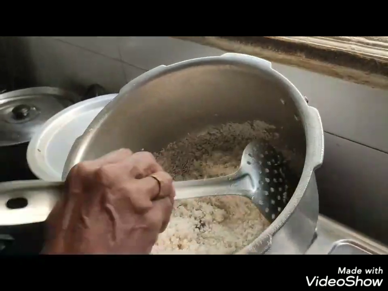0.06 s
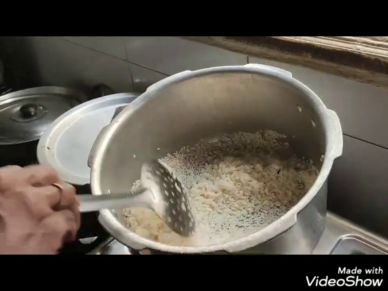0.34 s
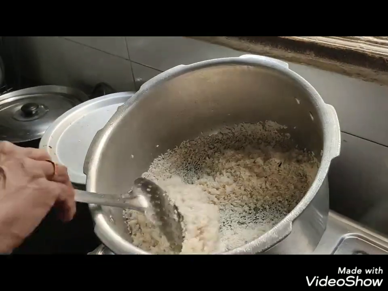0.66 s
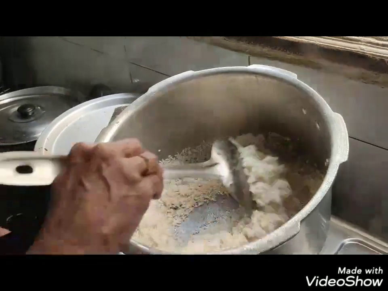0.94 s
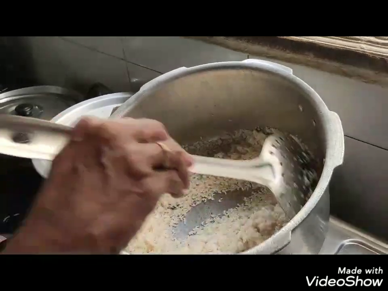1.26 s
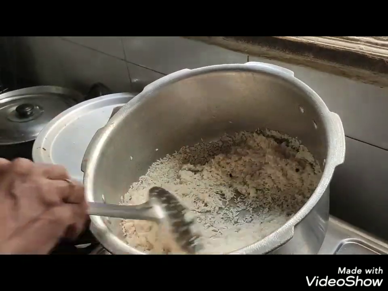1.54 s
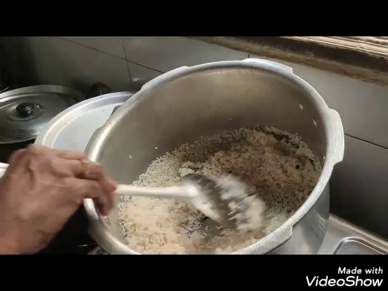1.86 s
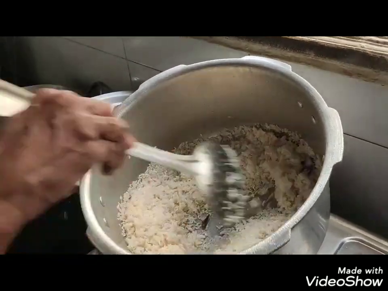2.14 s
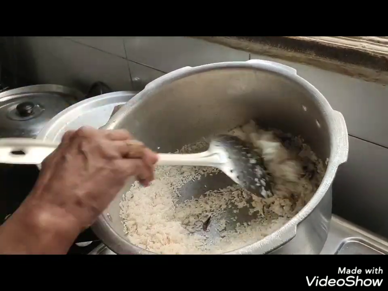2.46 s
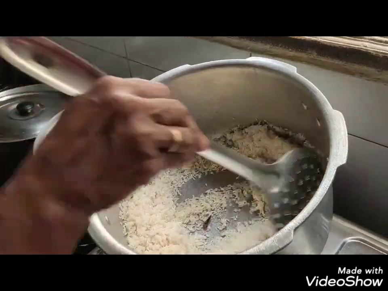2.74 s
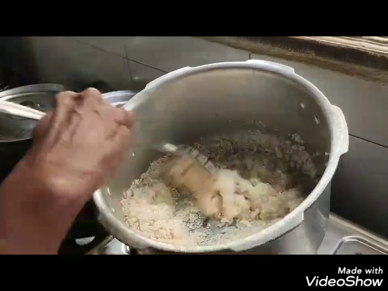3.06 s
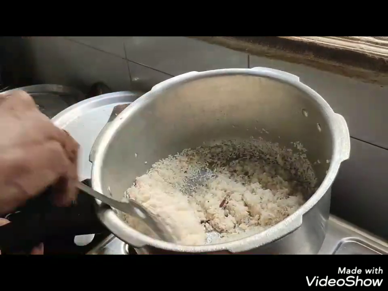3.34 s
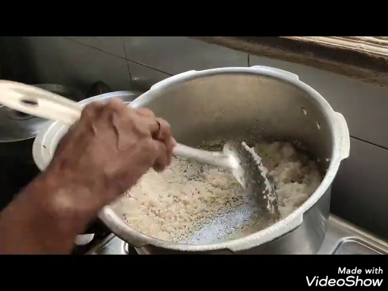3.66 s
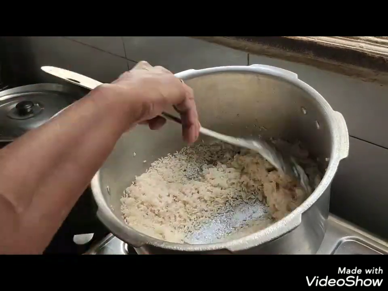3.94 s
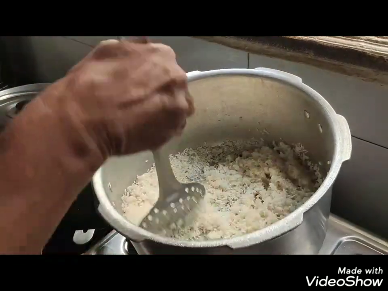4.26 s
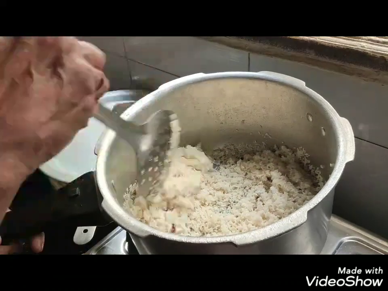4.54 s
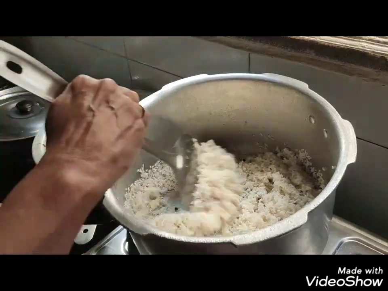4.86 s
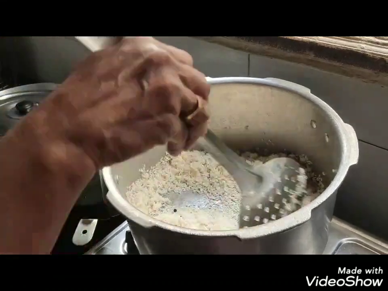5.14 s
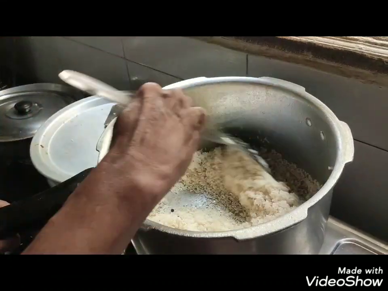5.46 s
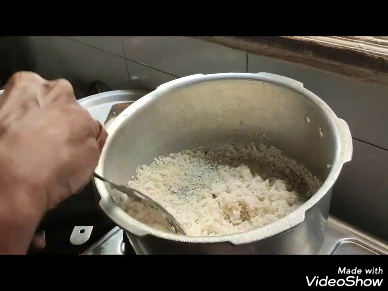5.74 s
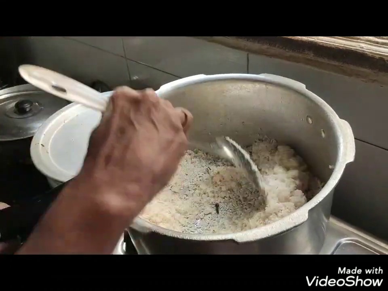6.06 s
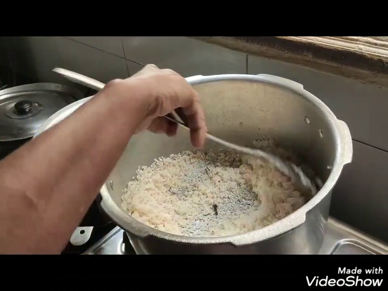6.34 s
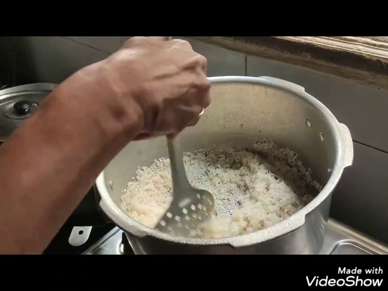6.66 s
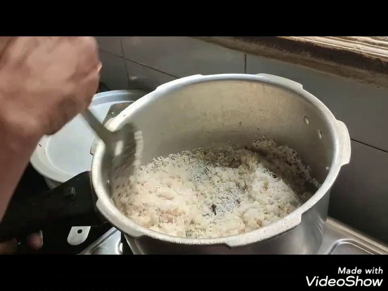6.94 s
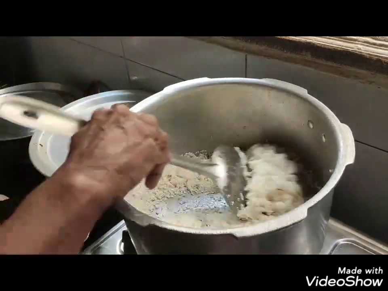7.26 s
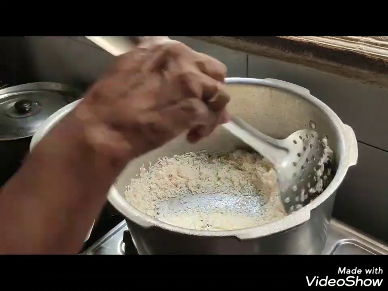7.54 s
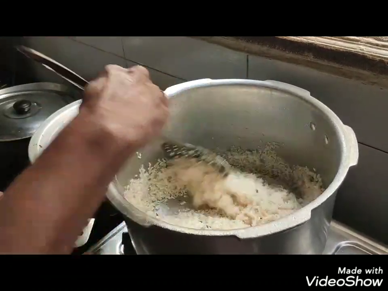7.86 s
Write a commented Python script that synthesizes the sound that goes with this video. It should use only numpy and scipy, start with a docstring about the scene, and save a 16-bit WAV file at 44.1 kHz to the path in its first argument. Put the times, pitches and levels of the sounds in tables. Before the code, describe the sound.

A perforated steel spoon knocks and scrapes around a metal pot, turning damp rice over a light sizzle.

```python
"""A sharp clack, close up: a perforated steel spoon hits an aluminium cooker and starts turning rice.
Its edge sticks and slips over the crusted bottom, snaps free, sings up the wall and knocks again,
ringing spoon and pot. Damp rice thuds and groans as it is pushed ahead. Steam bubbles sizzle lightly
in the hollow of the pot; behind it are a low kitchen rumble, a brief hum and a faint cricket-like chirp."""
import sys
import numpy as np
from scipy import signal
from scipy.fft import rfft, irfft
from scipy.io import wavfile

SR = 44100
rng = np.random.default_rng(int(sys.argv[2]) if len(sys.argv) > 2 else 0)


def unload_audio(sound):
    """Save the sound as a 16-bit wav file, at the path given as the first command line argument."""
    columns = np.transpose(np.atleast_2d(sound))
    # keep every value between -1 and 1, then stretch to whole-number steps
    steps = np.round(np.clip(columns, -1, 1) * 32767)
    wavfile.write(sys.argv[1], SR, steps.astype(np.int16))


N = 357210
T = np.arange(N) / SR
HIT = SR // 3  # samples in a one-shot


def undb(db):
    """Decibels to gain."""
    return 10 ** (np.asarray(db) / 20)


def unit(x):
    """Scale to rms 1."""
    return x / np.sqrt(np.mean(x ** 2))


def convolve(x, response):
    """Pass a sound through an impulse response, per channel."""
    return signal.oaconvolve(np.atleast_2d(x), response, axes=1)[:, :N]


def colour(x, points, size=2048):
    """Minimum-phase EQ through (frequency [Hz], gain [dB]) points."""
    hz, db = np.transpose(points)
    outline = np.interp(np.log(np.fft.rfftfreq(size, 1 / SR) + 1), np.log(hz), db)
    cepstrum = irfft(np.log(undb(outline)))
    cepstrum[1:size // 2] *= 2
    cepstrum[size // 2 + 1:] = 0
    return convolve(x, irfft(np.exp(rfft(cepstrum)))[None])


def noise(size=N, likeness=0.054):
    """Stereo white noise; likeness is the share of power common to both channels."""
    centre = rng.standard_normal(size)
    return np.sqrt(likeness) * centre + np.sqrt(1 - likeness) * rng.standard_normal((2, size))


def fall(t60, size=HIT):
    """Exponential decay, 60 dB down after t60 seconds."""
    return np.exp(-np.log(1000) * T[:size] / t60)


def gesture(start, hold, attack, release):
    """Envelope at full level from start for hold seconds; attack and release are seconds per 20 dB."""
    below = np.maximum(start - T, 0) / attack + np.maximum(T - start - hold, 0) / release
    return 10 ** -np.minimum(below, 10)


def cue(start):
    """The samples covered by a one-shot fired at start seconds."""
    return slice(int(start * SR), int(start * SR) + HIT)


def walk(rate):
    """Random drift with rate turning points a second, spread near 1."""
    return np.interp(T * rate, np.arange(N // 20), rng.standard_normal(N // 20))


def grains(rate, spread_db):
    """Tiny random impacts of uneven size, about rate a second."""
    clicks = (rng.random(N) < rate / SR) * rng.choice([-1, 1], N)
    return unit(clicks * undb(spread_db * np.clip(rng.standard_normal(N), -2, 2)))


def ring(modes):
    """Struck modes: their strengths depend on the point of contact, their phases on the channel."""
    t = T[:HIT]
    total = 0
    for hz, db, t60 in modes:
        phase = rng.uniform(0, 2 * np.pi) + .7 * rng.standard_normal((2, 1))
        strength = undb(db + rng.uniform(-4, 4))
        build = 1 - np.exp(-(t * hz / 2) ** 2)  # a mode takes a few cycles to form
        total = total + strength * build * fall(t60) * np.sin(2 * np.pi * hz * t + phase)
    return total


def resonate(x, hz, t60):
    """One resonance whose centre may glide; complex output."""
    turn = np.exp(2j * np.pi * np.cumsum(hz) / SR)
    return signal.lfilter([1], [1, -np.exp(-np.log(1000) / (t60 * SR))], x / turn) * turn


def reflections(t60, wet_db):
    """Impulse response of the direct sound and its dense reflections inside the pot."""
    response = noise(SR // 4) * fall(t60, SR // 4)
    response *= undb(wet_db) / np.sqrt(np.sum(response[0] ** 2))
    response[:, 0] += 1
    return response


def scatter(x, t60, wet_db):
    """Spread grains all over the pot, each with its own short tail of reflections."""
    tail = np.sqrt(abs(convolve(x ** 2, fall(t60, SR // 2)[None] ** 2))) * noise()
    return unit(x + undb(wet_db) * unit(tail))


def travel(x, response, count=5):
    """The spoon moves on: every 1/20 s it excites the next of count spots on the pot, round robin."""
    place = (T * 20).astype(int) % count
    return unit(sum(convolve(x * (place == k), response()) for k in range(count)))


# EQ of the room tone and of the rumble under it: (frequency [Hz], gain [dB])
ROOM_EQ = [(20, 8.5), (60, 8), (120, 9.5), (280, 4), (500, 0), (750, -7.5), (2000, -14)]
RUMBLE_EQ = [(26, 7.5), (45, -0.5), (200, -64)]
# fader ride on the rumble: (time [s], relative level [dB])
RUMBLE_RIDE = [(0.0, -58.5), (1.1, -60.5), (2.2, -56.5), (2.7, -60.5), (4.0, -63.5), (8.1, -73.5)]

def kitchen(room_db=-52):
    """The bed: low, wavering room tone over a deep rumble that slowly recedes."""
    room = unit(colour(noise(likeness=0.82), ROOM_EQ)) * undb(room_db + 2 * walk(5.7))
    rumble = unit(colour(noise(likeness=0.87), RUMBLE_EQ))
    ride_db = np.interp(T, *np.transpose(RUMBLE_RIDE))
    return room + rumble * undb(ride_db + 9)


# one background swell: (time [s], hold [s], pitch [Hz], level [dB])
HUM_CUE = (0.36, 0.07, 156, -50)

def hum():
    """A brief low hum swells and fades."""
    start, hold, hz, db = HUM_CUE
    return undb(db) * gesture(start, hold, attack=0.06, release=0.1) * unit(np.sin(2 * np.pi * hz * T))


def chirps(hz=2520, pulses_per_s=24.3, width_hz=140, group_s=0.22):
    """Cricket-like chirping: rough pulses of narrow-band noise, in little groups with pauses between."""
    beat = np.cumsum(pulses_per_s * (1 + 0.1292 * walk(9))) / SR
    pulses = np.sin(np.pi * beat) ** 10
    groups = np.cos(np.pi * T / group_s) ** 4 * undb(3 * walk(7))
    band = [(hz + widths * width_hz, db) for widths, db in [(-3, -45), (-.5, 0), (.5, 0), (3, -45)]]
    return unit(colour(noise(), band) * pulses * groups) * undb(-55.5)


# turned rice lands on hot metal and the sizzle flares: (time [s], level [dB])
SIZZLE_FLARES = [(1.8, -42), (3.25, -41.5), (3.848, -56), (4.5, -51), (4.95, -43), (5.76, -40.5),
                 (8.048, -37.5)]
# EQ of the bursting bubbles: (frequency [Hz], gain [dB])
SIZZLE_EQ = [(500, -6), (1000, -1.5), (1400, -6.5), (2000, 1.5), (2700, 3.5), (3600, -4.5), (4800, -4),
             (6500, 1), (9700, 4.5), (12500, 0.5), (15000, -7)]
# resonances of the air in the pot: (frequency [Hz], level [dB], t60 [s])
AIR_MODES = [(294, 0, 0.1), (440, -1, 0.07), (1008, 1, 0.09), (1153, 4, 0.04), (1560, 1, 0.05),
             (2490, 5, 0.05)]

def sizzle(simmer_db=-42):
    """Tiny steam bubbles burst, livelier after rice is turned; the air in the pot hums along."""
    flares = sum(undb(db) * gesture(s, 0, attack=0.2, release=0.97) for s, db in SIZZLE_FLARES)
    pops = grains(2500, 5) * undb(1.8 * walk(22) + 1.1 * walk(5))
    hiss = unit(colour(scatter(pops, t60=0.095, wet_db=25), SIZZLE_EQ))
    hollow = unit(convolve(grains(220, 6.6), ring(AIR_MODES)) * undb(2 * walk(8.9)))
    return hiss * np.hypot(undb(simmer_db), flares) + undb(-48.5) * hollow


# bursts of spitting: (time [s], hold [s], pre-EQ level [dB])
SPIT_CUES = [(0.385, 0.0045, -42), (1.57, 0.095, -34), (3.173, 0.48, -41), (4.876, 0.15, -36.5)]
# their thin, bright EQ: (frequency [Hz], gain [dB])
SPIT_EQ = [(1000, -38), (3000, -2.5), (8000, -0.5), (12500, -1), (15000, -16)]

def spits():
    """Wet rice sears on bare metal, and single grains crackle throughout."""
    searing = sum(undb(db) * gesture(s, hold, attack=0.038, release=0.026) for s, hold, db in SPIT_CUES)
    crackles = undb(-54) * scatter(grains(30, 6), t60=0.02, wet_db=5)
    spray = scatter(grains(900, 3), t60=0.098, wet_db=9.5)
    return colour(spray * searing + crackles, SPIT_EQ)


# the spoon shoves a heap of rice: (time [s], hold [s], relative level [dB], groan pitch [Hz])
RICE_SHOVES = [(0.795, 0.12, -41.5, 420), (1.893, 0.13, -39, 440), (2.424, 0.16, -35, 420),
               (3.058, 0.062, -41.5, 454), (3.478, 0.11, -38, 462), (3.757, 0.3, -46, 329),
               (4.17, 0.044, -33.5, 458), (4.265, 0.031, -31.5, 429), (4.925, 0.07, -40, 368),
               (5.021, 0.093, -40.5, 401), (5.24, 0.12, -44, 340), (6.501, 0.16, -35.5, 434),
               (6.674, 0.065, -32, 439), (7.162, 0.18, -38.5, 392), (7.742, 0.17, -46, 402)]
# muffled EQ of damp clumps: (frequency [Hz], gain [dB])
CLUMP_EQ = [(170, -25.5), (310, -2), (500, -0.5), (680, 0.5), (900, -4), (2000, -46), (6000, -44)]

def rice(settling_db=-56.5):
    """Damp clumps thud softly and, rubbed along under the spoon, make the bottom groan."""
    shoves = np.array([undb(db) * gesture(s, hold, attack=0.071, release=0.092)
                       for s, hold, db, _ in RICE_SHOVES])
    pitch = np.array(RICE_SHOVES)[:, 3] @ shoves / shoves.sum(axis=0)  # the strongest shove leads
    clumps = grains(380, 3)
    thuds = unit(colour(travel(clumps, lambda: reflections(0.043, 1.8), count=3), CLUMP_EQ))
    groan = resonate(clumps, pitch * (1 + 0.035 * walk(23)), t60=0.085).real
    groan = unit(colour(groan, [(150, -25), (290, 0), (600, 0), (1200, -20)]))
    level = np.hypot(shoves.max(axis=0), undb(settling_db))  # rice keeps crumbling between shoves
    return (undb(-7) * thuds + undb(-4) * groan) * level


# soft bumps: (time [s], level [dB])
LUMP_CUES = [(2.442, -17), (2.552, -14.5), (2.573, -21.5), (2.918, -17.5), (3.027, -22), (3.491, -14.5),
             (4.148, -17), (4.265, -21), (6.486, -22), (6.528, -26), (6.674, -22), (6.717, -25),
             (7.142, -21)]

def lumps(centre_hz=440, t60=0.02):
    """A lump gives way and the spoon bumps the damped bottom: a few low cycles, each bump retuned."""
    out, t = np.zeros(N + SR), T[:HIT]
    for s, db in LUMP_CUES:
        hz = centre_hz * (1 + .08 * rng.standard_normal())
        envelope = fall(t60) * (1 - np.exp(-t * hz))
        out[cue(s)] += undb(db) * np.sin(2 * np.pi * hz * t) * envelope
    return out[:N]


# low bongs: (time [s], level [dB])
BONG_CUES = [(4.17, -37.5), (4.31, -40.5), (4.736, -43), (6.73, -46.5), (7.926, -41)]
# resonances of the whole pot: (frequency [Hz], level [dB], t60 [s])
BONG_MODES = [(308, -13, 0.4), (546, 2.5, 0.84)]

def pot_body():
    """The whole pot rings on, low and hollow, when the spoon springs off it."""
    out = np.zeros((2, N + SR))
    for s, db in BONG_CUES:
        out[:, cue(s)] += undb(db) * ring(BONG_MODES) * (1 - fall(0.027))
    return out[:, :N]


# resonances of the pot's bottom: (frequency [Hz], level [dB], t60 [s])
BOTTOM_MODES = [(307.3, -8.5, 0.15), (376, -3.5, 0.087), (520, -2.5, 0.14), (1045, 1.5, 0.084),
                (1129, 1.5, 0.095), (1214, 2.5, 0.082), (1558, -2, 0.14), (1690, 18, 0.0061),
                (2157, -1.5, 0.081), (2710, 2, 0.05), (3636, -4, 0.14)]

def bottom_ring():
    """One tap on the bottom, its ring damped by rice."""
    return ring(BOTTOM_MODES)


# EQ of a contact through the crust: (frequency [Hz], gain [dB])
CRUST_EQ = [(150, -23), (450, -22), (800, -13.5), (1250, -8.5), (2400, -4), (4000, -20), (12000, -26.5)]

def crust(x):
    """The crust cushions a contact, leaving a bite in the upper mids."""
    return colour(x, CRUST_EQ)


# strokes over the bottom, with relative levels for three layers:
# (time [s], hold [s], attack [s], grind [dB], grit [dB], snags [dB])
SCRAPE_STROKES = [(0.901, 0.005, 0.088, -35, -37.5, -52), (1.983, 0.018, 0.13, -32, -39, -38),
                  (2.484, 0.029, 0.11, -31, -33.5, -28), (3.589, 0.059, 0.092, -31.5, -38.5, -34.5),
                  (4.153, 0.06, 0.0089, -41.5, -56, -64), (4.273, 0.059, 0.17, -41, -36.5, -57),
                  (6.52, 0.014, 0.15, -55, -50.5, -62), (6.699, 0.037, 0.15, -38, -44.5, -50),
                  (7.3, 0.0083, 0.1, -34.5, -36, -34.5)]
# EQ of crushed grit: (frequency [Hz], gain [dB])
GRIT_EQ = [(200, -18), (480, -4), (700, -9), (1100, 1), (2300, 4), (3400, 0), (6000, 0), (9500, -2),
           (14000, -12)]

def bottom_scrapes(stutter_per_s=37, stutter_db=1):
    """The edge sticks and slips over the bottom, ringing it, crushing grit, snagging on burnt grains."""
    pressing = crushing = snagging = 0
    for s, hold, attack, grind_db, grit_db, snag_db in SCRAPE_STROKES:
        stroke = gesture(s, hold, attack, release=0.092)
        pressing += undb(grind_db) * stroke
        crushing += undb(grit_db) * gesture(s, hold, attack, release=0.12)
        snagging += undb(snag_db) * stroke
    slips = grains(1100, 5) * undb(2.5 * walk(70))
    slips = signal.sosfilt(signal.butter(4, 260, "high", fs=SR, output="sos"), slips)
    burnt = grains(330, 3.5)
    snags = unit(crust(travel(burnt, lambda: reflections(0.018, 17), count=2))) * snagging
    grind = travel(slips, bottom_ring) * pressing
    grit = unit(colour(travel(slips, lambda: reflections(0.03, 10), count=3), GRIT_EQ)) * crushing
    jerky_hand = undb(stutter_db * walk(stutter_per_s))
    return (undb(4) * grind + undb(8) * grit + snags) * jerky_hand


# the edge catches on the crust: (time [s], pre-EQ level [dB])
CATCH_CUES = [(0.739, -15.5), (0.871, -22), (0.898, -12), (0.905, -11.5), (1.891, -8.5), (1.903, -8.5),
              (1.998, -12), (2.493, -25), (2.552, -10.5), (3.491, -6.5), (3.582, -21), (3.657, -13),
              (3.679, -10), (7.318, -9)]

def catches(snap_t60=0.016, tail_t60=0.17):
    """The edge snaps free of the crust: a sharp crack with a short tail, ringing the pot's bottom."""
    out = np.zeros((2, N + SR))
    for s, db in CATCH_CUES:
        crack = noise(HIT) * (fall(snap_t60) + undb(-4.5) * fall(tail_t60))
        out[:, cue(s)] += undb(db) * (crack + undb(-19) * bottom_ring())
    return crust(out[:, :N])


# slides along the wall: (time [s], hold [s], relative level [dB], centre of the singing [Hz])
SLIDE_CUES = [(2.889, 0.049, -34, 4100), (3.066, 0.12, -33, 7900), (3.427, 0.031, -31, 4200),
              (4.784, 0.0092, -29.5, 7300), (5.348, 0.097, -28.5, 3670), (5.58, 0.039, -34, 1950),
              (6.658, 0.094, -33, 2350), (7.138, 0.015, -28, 7000), (7.691, 0.065, -27.5, 3900),
              (7.935, 0.023, -30, 7040)]
# EQ of the rasp: (frequency [Hz], gain [dB])
RASP_EQ = [(150, -43), (520, -23), (700, -25), (900, 1), (1500, -10), (2100, 4), (3100, 5), (4100, 11),
           (6500, 5.5), (10000, 3), (14000, -6)]
# resonances of the spoon, also struck in knocks(): (frequency [Hz], level [dB], t60 [s])
STEEL_MODES = [(1880, -5.5, 0.075), (2277, -3, 0.05), (3050, -4, 0.05), (3570, 2, 0.045), (3900, 2, 0.035),
               (4140, 4.5, 0.055), (5160, 1, 0.05), (5990, 3.5, 0.04), (6590, 0, 0.045), (7600, 1.5, 0.022),
               (8550, 2, 0.025), (8960, 1, 0.025)]
# notches where the wall hardly radiates: (frequency [Hz])
WALL_NOTCHES = [3500, 5000, 8440]

def wall_slides(favour_db=2, reach_octaves=0.38, bend=0.011, flicker_db=3.5):
    """Metal on metal: fine slips rasp and make the spoon sing, its modes swelling and bending en route."""
    slips = grains(1200, 3.5) * undb(1.8 * walk(120))
    rasp = unit(colour(convolve(slips, reflections(0.045, 12)), RASP_EQ))
    contacts = np.array([undb(db) * gesture(s, hold, attack=0.025, release=0.072)
                         for s, hold, db, _ in SLIDE_CUES])
    centre_hz = np.array(SLIDE_CUES)[contacts.argmax(axis=0), 3]
    singing = 0
    for hz, db, t60 in STEEL_MODES:
        # the point of contact favours the modes near one pitch
        boost_db = favour_db * np.exp(-(np.log2(hz / centre_hz) / reach_octaves) ** 2)
        mode = resonate(slips, hz * (1 + bend * walk(20)), t60)
        mode *= undb(db + boost_db + flicker_db * walk(20))
        stereo_phase = np.exp(1j * rng.standard_normal((2, 1)))
        singing = singing + (mode * stereo_phase).real
    scrape = rasp + undb(4) * unit(singing)
    for hz in WALL_NOTCHES:
        scrape = signal.lfilter(*signal.iirnotch(hz, Q=16, fs=SR), scrape)
    return scrape * contacts.sum(axis=0)


# blows on the rim: (time [s], pitch [Hz], level [dB])
CLINK_CUES = [(0.698, 4130, -29), (2.879, 4129, -22), (4.732, 2277, -24), (7.081, 4270, -21),
              (7.661, 5640, -26)]

def clinks(t60=0.14):
    """One high mode of the spoon rings on after a blow on the rim."""
    # the clink reaches both channels together and rings clear in the middle
    align_s = np.array([[1e-4], [0]])
    out = 0
    for s, hz, db in CLINK_CUES:
        envelope = undb(db) * (T > s) * np.exp(-np.log(1000) * abs(T - s) / t60)
        out = out + envelope * np.sin(2 * np.pi * hz * (T - s + align_s))
    return out


# spoon hits the wall, levels relative: (time [s], level [dB], treble [dB], ping [dB], chatter t60 [s])
KNOCK_CUES = [(0.057,-7.5,-8.5,-27.5,0.044), (0.697,-5.5,-1,-41.5,0.036), (2.371,0.5,-10.5,-30.5,0.075),
              (2.879,-1.5,-6,-35,0.011), (3.068,-17,-5.5,-46,0.083), (3.43,-5.5,-9.5,-57,0.019),
              (3.442,-7,-4.5,-47,0.016), (3.97,-9.5,-6,-39,0.028), (4.132,-27,-1,-63,0.025),
              (4.692,-25,-1,-71,0.018), (4.731,-0.5,-6.5,-36,0.054), (5.346,-18,0,-55,0.029),
              (5.589,-5.5,-9,-30.5,0.018), (6.289,-7,-15.5,-44,0.039), (6.312,-10,-10.5,-40,0.033),
              (6.618,-19.5,-6,-39.5,0.23), (7.08,-0.5,-3.5,-38,0.046), (7.139,-12.5,-1.5,-56,0.053),
              (7.661,-10,0,-35,0.035), (7.926,-11.5,-7,-34,0.035)]
# EQ of the clack: (frequency [Hz], gain [dB])
CLACK_EQ = [(100, -12.5), (300, -3.5), (520, -1), (700, -1.5), (1100, -4), (2200, -4.5), (3300, -2),
            (4200, -2), (5000, -2.5), (7500, 0), (10500, -3), (14000, -15)]
# the spoon's clearest mode, brought out by a well placed blow: (frequency [Hz], level [dB], t60 [s])
PING_MODE = [(1870, 5.5, 0.17)]

def knocks(usual_t60=0.055, attack_share=0.23):
    """The edge chatters on the wall; the pot's crowded modes die quickly and the spoon rings on."""
    clacks, pings = np.zeros((2, 2, N + SR))
    tail = undb(-5) * fall(0.15) + undb(-22) * fall(1.0)
    cushion = signal.butter(1, 2500, fs=SR, output="sos")  # rice under the edge dulls the blow
    for s, db, treble_db, ping_db, t60 in KNOCK_CUES:
        decay = fall(t60) + tail * np.sqrt(t60 / usual_t60)  # shorter knocks leave less tail
        chatter = noise(HIT) * decay * (1 - fall(attack_share * t60))
        blow = chatter + undb(-14.5) * ring(STEEL_MODES)
        dull = signal.sosfilt(cushion, blow)
        clacks[:, cue(s)] += undb(db) * (dull + undb(treble_db + 7) * (blow - dull))
        pings[:, cue(s)] += undb(ping_db) * ring(PING_MODE) * (1 - fall(0.093))
    return undb(-5) * colour(clacks[:, :N], CLACK_EQ) + undb(8.5) * pings[:, :N]


def scene(notch_hz=690):
    """Stirring over sizzle and room; the notch is a gap between air modes where the pot radiates poorly."""
    stirring = knocks() + catches() + bottom_scrapes() + wall_slides() + rice() + lumps() + clinks()
    stirring = signal.lfilter(*signal.iirnotch(notch_hz, Q=4.5, fs=SR), stirring)
    pot = stirring + pot_body() + sizzle() + spits()
    return pot + chirps() + kitchen() + hum()


# stereo balance by band: (frequency [Hz], left minus right [dB])
BALANCE_EQ = [(100, 2.5), (500, 0.5), (1200, -2.5), (2200, -5), (4500, -3), (6500, -3.5), (9000, 2),
              (14000, 3.5)]

def record(dry, top_hz=14900):
    """The pot sits a little to the right; each channel has its own EQ, then soft clipping and a high cut."""
    late_left = np.roll(dry[0], 4)
    left = colour(late_left, [(hz, db / 2) for hz, db in BALANCE_EQ])
    right = colour(dry[1], [(hz, -db / 2) for hz, db in BALANCE_EQ])
    high_cut = signal.ellip(8, .2, 80, top_hz, fs=SR, output="sos")
    return signal.sosfilt(high_cut, np.tanh(np.vstack([left, right])))


dry = scene()
out = record(dry)
unload_audio(out)
```